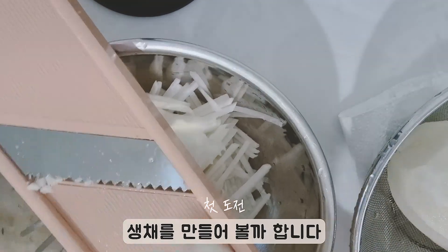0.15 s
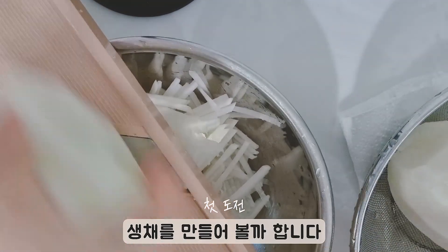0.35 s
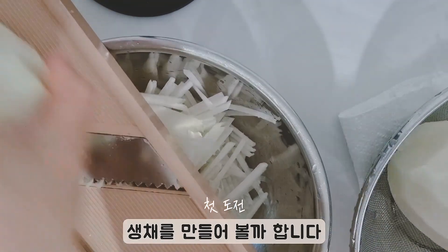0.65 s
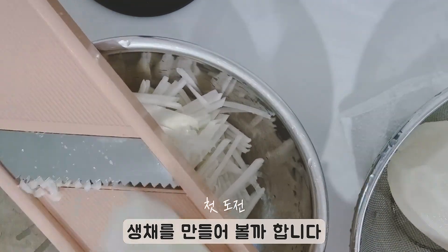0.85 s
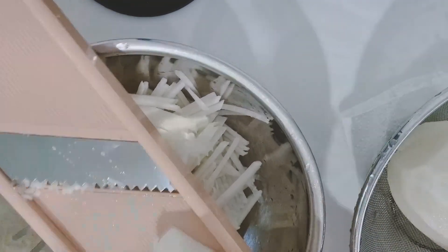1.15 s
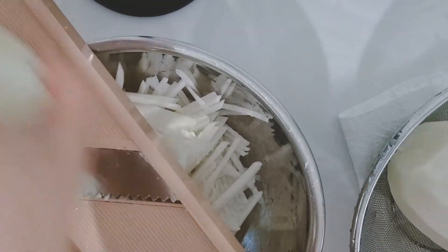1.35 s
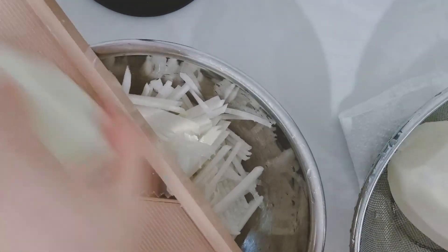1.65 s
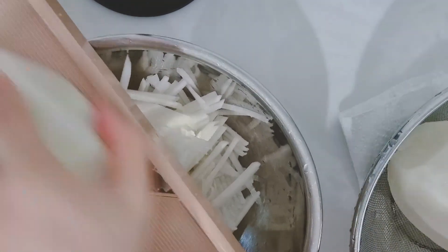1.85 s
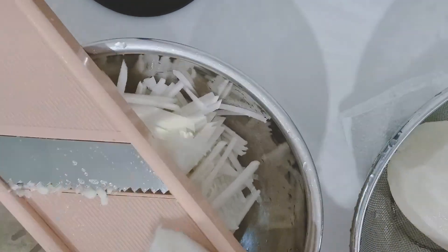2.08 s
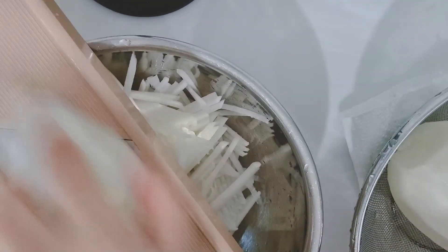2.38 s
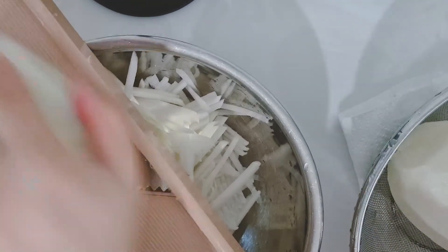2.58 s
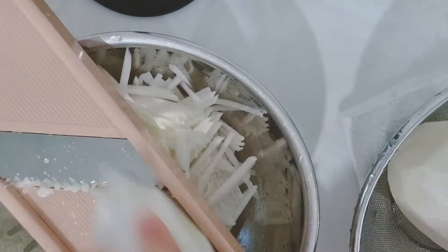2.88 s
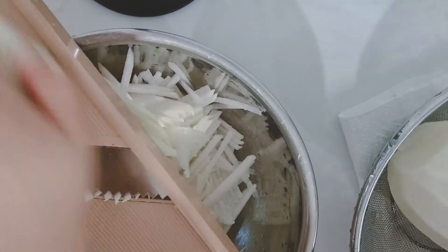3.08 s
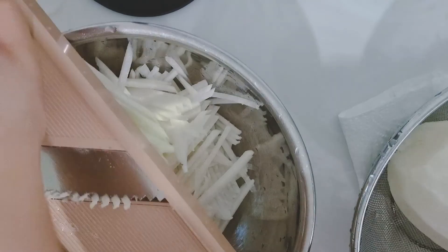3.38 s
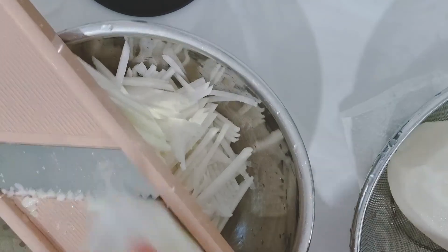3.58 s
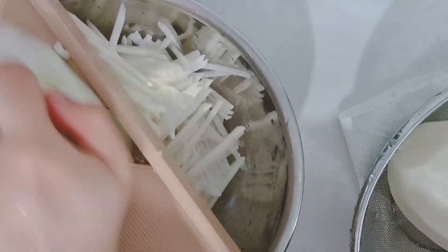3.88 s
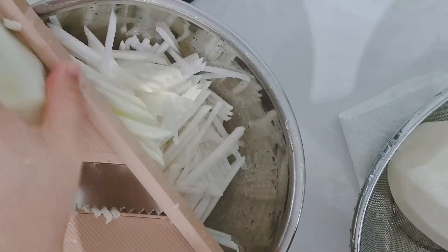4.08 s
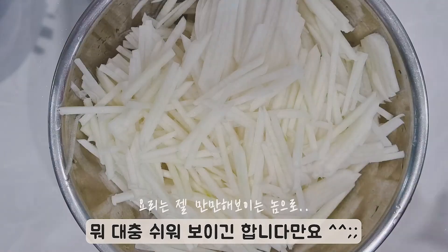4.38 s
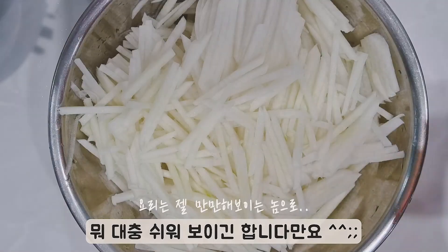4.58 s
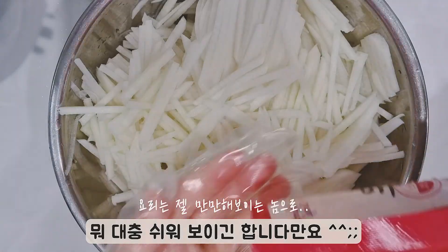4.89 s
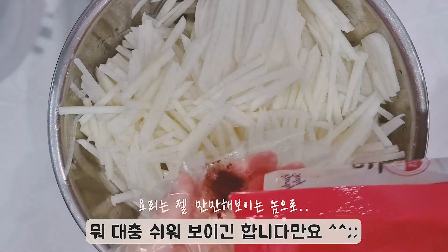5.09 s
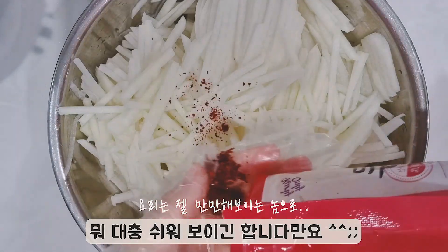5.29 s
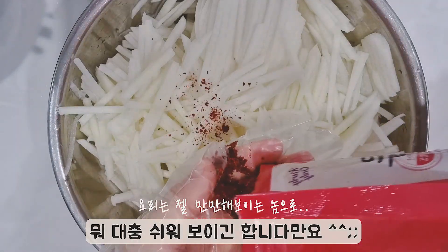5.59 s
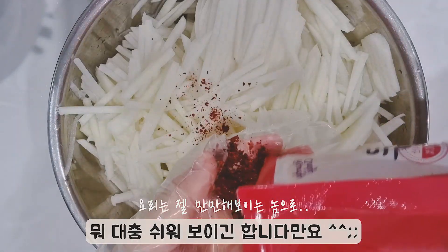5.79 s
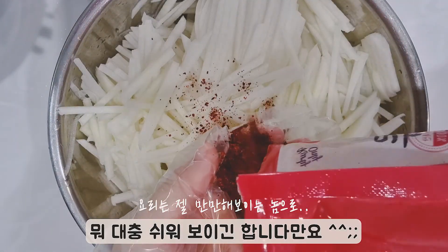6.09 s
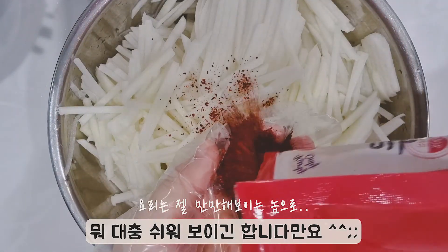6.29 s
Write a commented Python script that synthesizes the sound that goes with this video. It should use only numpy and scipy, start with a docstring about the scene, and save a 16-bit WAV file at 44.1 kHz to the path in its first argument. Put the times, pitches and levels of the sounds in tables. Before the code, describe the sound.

Brisk back-and-forth slicing, recorded close with little room echo: each juicy rasping cut is followed by a knock of the plastic board and a light brushing return, the bowl thumping faintly below. A tiny squeak comes early. Slicing stops with a hollow double tap, then much quieter plastic film rustles and crackles in irregular squeezes over soft room air, low rumble and a faint hum.

```python
"""Quiet room air and rumble throughout. A radish runs fast over a toothed board on a steel bowl: soft return
strokes (slip grains through a hiss and rings), knocks, mostly at the turn (noise bursts through resonances),
hissing cuts (tearing grains); early on, a squeak (falling sine). Two hollow toks (swelling sines) close it.
A second scene follows: an appliance hum (wavering sine) fades in and a plastic bag crinkles (snap grains,
ringing pings, dull taps). Drifting phases blur hits and part left from right."""
import sys
import numpy as np
from scipy import signal
from scipy.fft import rfft, irfft, next_fast_len
from scipy.io import wavfile
from scipy.ndimage import uniform_filter1d

SR = 44100
rng = np.random.default_rng(int(sys.argv[2]) if len(sys.argv) > 2 else 0)


def transcribe(u):
    """Save the signal u as a 16-bit wav file named by the first command-line argument.

    u: samples, shape (n,) or (channels, n), limited to [-1, 1]; the rate is SR.
    q: integer samples, one column per channel.
    """
    v = np.clip(np.atleast_2d(u).T, -1, 1)
    q = np.round(v * 32767).astype(np.int16)
    wavfile.write(sys.argv[1], SR, q)


def gain_from_db(level_db):
    """Turn a decibel level (scalar or array-like) into a linear amplitude factor."""
    decades = np.asarray(level_db, float) / 20
    return 10 ** decades


N = 284445
T = np.arange(N) / SR

# room air spectrum: f/Hz, density/dB
ROOM_SPECTRUM = [(32, -24.5), (55, 0.5), (100, -6), (150, -7.5), (215, -7.5), (444, -19), (634, -12.5),
                 (905, -23), (1290, -17), (1890, -23.5), (6650, -28), (9950, -33.5), (16000, -35)]
# level of air and rumble over time: t/s, level/dB
ROOM_LEVEL = [(0, 3), (4.18, 5), (4.21, -1), (4.34, -1), (4.42, 0.7), (6.45, 3)]
# left-right likeness of the air: f/Hz, correlation/1
ROOM_LIKENESS = [(60, 0.11), (240, 0.17), (950, 0.024), (3770, 0.072), (15000, 0.002)]
# building rumble, one mode: f/Hz, width/Hz, level/dB (before ROOM_LEVEL)
RUMBLE = (26, 4.8, -67.5)
# appliance hum: f/Hz, level/dB (before a 3 dB lift)
HUM = (162, -67)
# return strokes over the ridges: t/s, length/s, hiss level/dB, change to the turn/dB, board re hiss/dB
RETURNS = [(-.02, 0.028, -38.5, -5, -2.5), (0.063, 0.042, -63, 9.5, 0.5), (0.11, 0.019, -40.5, 3, 2),
           (0.364, 0.069, -51, 6.5, -2.5), (0.756, 0.063, -49, 2.5, 1), (1.085, 0.049, -49.5, 10, -0.5),
           (1.408, 0.05, -42.5, 6.5, -2), (1.671, 0.03, -63, 7, 0), (1.709, 0.035, -41.5, 5, 3),
           (2.014, 0.069, -49.5, 12.5, -1), (2.396, 0.068, -49.5, 9.5, 3), (2.739, 0.063, -60, 20, 4),
           (3.137, 0.071, -48.5, 9, 0.5), (3.48, 0.042, -48, 7.5, 3.5), (3.818, 0.075, -54, -16, 6),
           (4.081, 0.11, -71.5, 8, 2)]
# hiss of flesh on the ridges: f/Hz, level/dB
RETURN_HISS = [(880, -48.5), (1500, -15.5), (1760, -3.5), (2640, -4), (3180, -2.5), (4290, -7.5),
               (7690, -13.5), (8490, -18.5), (11000, -29), (16000, -44)]
# board modes: f/Hz, pole width/Hz (widened in knocks), level/dB
BOARD_MODES = [(373.5, 166, -5.5), (541.6, 57, -4.5), (604, 40, -3.5), (695.6, 66.5, 1.5),
               (800.6, 26, -6.5), (999, 47, -8), (1092, 270, 0.5), (1300, 330, -5)]
# bowl rocking on the counter, modes: f/Hz, pole width/Hz (widened in knocks), level/dB
BOWL_MODES = [(50.3, 20, -29.5), (79.24, 5.5, 4), (152.2, 59, -4.5), (202, 21.8, -7), (229.2, 54.5, -5)]
# juice and finest fibres: f/Hz, level/dB
RASP_SPECTRUM = [(1500, -21), (3000, -5.5), (6000, 3.5), (10000, -4.5), (12500, 0), (15500, 3),
                 (16000, -32.5)]
# knocks of the board, mostly at the turn, some at or within other strokes:
# t/s, board level/dB, thump re board/dB, crack re board/dB, strongest ring f/Hz
KNOCKS = [(0.106, -29.5, -15, -9.5, 630), (0.122, -28.5, 5.5, -6.5, 656), (0.295, -57, 15, -2, 600),
          (0.325, -44, -28, -15, 700), (0.362, -42, -12, -11, 800), (0.423, -34.5, 5.5, -17, 643),
          (0.807, -27.5, -4.5, -14, 757), (1.143, -22.5, 2.5, -7, 477), (1.316, -29.5, -15, -11, 744),
          (1.441, -17, -7, -9.5, 532), (1.705, -29.5, -8, -5.5, 660), (1.733, -27, 3, -27.5, 973),
          (2.062, -22, 1, 1, 516), (2.449, -26, 0, -8, 540), (2.787, -36, -9.5, -6.5, 684),
          (2.83, -30.5, -4.5, -25, 495), (3.034, -33.5, -6.5, -6, 820), (3.14, -37.5, -10.5, -3, 650),
          (3.191, -28, -6.5, -1.5, 720), (3.537, -22.5, -8.5, -2.5, 680), (3.619, -34, -17.5, -23, 685)]
# crack of a knock: f/Hz, level/dB
CRACK_SPECTRUM = [(880, -63.5), (1500, 5), (2770, 5), (3520, 7), (4460, -0.5), (4870, 3), (6060, 0.5),
                  (14300, -30.5), (16000, -28)]
# cutting strokes: t/s, length/s, hiss level/dB, change to the exit/dB, board re hiss/dB
CUTS = [(0.187, 0.08, -39.5, 6.5, 3.5), (0.551, 0.096, -35.5, -3, 1.5), (0.889, 0.1, -36, 0.5, 0),
        (1.224, 0.073, -34, -2.5, 0.5), (1.522, 0.081, -34.5, -1, 0), (1.812, 0.11, -31.5, -9, 1),
        (2.149, 0.13, -34.5, -2.5, -2.5), (2.529, 0.096, -34.5, 0, 0), (2.901, 0.12, -35, 0, -1),
        (3.251, 0.11, -34.5, -1.5, 1), (3.616, 0.1, -35.5, -1.5, -2), (3.912, 0.036, -35, -3.5, 3)]
# hiss of tearing fibres: f/Hz, level/dB
CUT_HISS = [(880, -57), (1500, -3.5), (2220, -5), (2440, 0.5), (2740, -8.5), (2960, 0), (4530, -2.5),
            (5160, 0), (5890, -8), (7590, -9.5), (9500, -19.5), (12400, -55.5), (20900, -120)]
# low bowl rocks, mostly during cuts: t/s, length/s, level/dB
ROCKS = [(0.561, 0.013, -42.5), (0.609, 0.043, -41), (0.956, 0.05, -43), (1.89, 0.033, -46),
         (2.148, 0.022, -40.5), (2.259, .02, -45.5), (2.54, 0.015, -53), (2.846, 0.052, -40),
         (3.362, .015, -44.5), (3.498, 0.018, -52.5), (3.61, 0.022, -42.5), (3.904, 0.06, -57)]
# lifted board taps the rim: t/s, peak level/dB, f/Hz, time to peak/s
TOKS = [(4.127, -31.5, 710, 0.0052), (4.136, -30.5, 770, 0.0048)]
# bag squeezes: t/s, length/s, crinkle level/dB, change to the end/dB, duller flexing re crinkle/dB
SQUEEZES = [(4.298, 0.0061, -64.5, -12, -20), (4.362, 0.0089, -68, 6.5, -17),
            (4.443, 0.056, -64.5, -4, -12), (4.533, 0.042, -60, -4, -9), (4.63, .04, -48, -24, -1.5),
            (4.68, 0.027, -39, -6, -3.5), (4.732, 0.11, -62, 4.5, -6.5), (4.899, 0.058, -58, 3.5, -5.5),
            (4.999, 0.054, -51, 1.5, -4.5), (5.099, 0.065, -47.5, -6, -14.5), (5.267, 0.021, -56.5, 3, -6),
            (5.334, .006, -47, -16, -13), (5.365, 0.083, -64, 6, -3.5), (5.473, .17, -51.5, -8.5, -13),
            (5.69, .006, -61.5, -1.5, -20.5), (5.727, 0.22, -63.5, 2.5, -11.5),
            (6.01, 0.0053, -57, -3.5, -5), (6.05, .17, -62, -3, -14), (6.253, 0.022, -51.5, 3, -15),
            (6.333, 0.017, -54.5, -4, -22), (6.372, .1, -66, -6, -23)]
# crinkle of film: f/Hz, level/dB
CRINKLE_SPECTRUM = [(1290, -30.5), (2200, -5), (2410, -8), (2710, -0.5), (4610, 1.5), (7090, 3.5),
                    (10800, -8), (12600, -5), (15100, -3), (16000, -35)]
# flexing of film: f/Hz, level/dB
FLEX_SPECTRUM = [(290, -16), (500, -10.5), (767, -3), (1080, -8.5), (1310, 0), (1830, -8), (2200, -9),
                 (2860, -15.5), (4840, -120)]
# single creases that ping: t/s, level/dB (before an 11 dB cut), f/Hz
PINGS = [(4.3024, -47, 4830), (4.358, -50, 2810), (4.9266, -34.5, 3560), (5.288, -35.5, 4300),
         (5.323, -36.5, 5900), (5.5494, -48, 5850), (5.6023, -40.5, 6760), (5.6805, -38, 6860),
         (5.899, -44.5, 2790), (6.067, -44.5, 6670), (6.1097, -46, 5680), (6.3288, -42.5, 6190),
         (6.4307, -45, 6880)]
# dull taps of the bag: t/s, level/dB (before a 7 dB cut), f/Hz
TAPS = [(4.586, -36.5, 850), (4.628, -42, 1260), (4.717, -44, 1340), (5.031, -44.5, 1490),
        (5.274, -48.5, 1300), (6.006, -36, 1760)]
# body of a tap: f/Hz, level/dB
TAP_SPECTRUM = [(150, -18), (250, -2.5), (450, -1), (742, 0), (1000, 1.5), (1690, 4.5), (1860, 3),
                (2400, -31), (3120, -57), (5280, -120)]
# stereo tilt of the action: f/Hz, left minus right/dB
SIDES = [(60, 3.5), (240, -0.5), (950, 0.5), (3770, 2), (15000, 2)]
# short diffuse tail: f/Hz, level/dB
ECHO_SPECTRUM = [(100, 8.5), (500, 1.5), (2000, -2), (6000, -10.5), (16000, 2)]
# balance of the action over time: t/s, left minus right/dB
PAN = [(0, -2), (4.18, -2), (4.45, 0), (6.45, 0)]

ROOM_DB = -66
START_DB_PER_S, STOP_DB_PER_S, SLIDE_THUMP_DB = 1303, 898, -7.5
NEARING_DB, NEARING_DB_PER_S = -12, 254.5  # light brush before full contact
SLIDE_RASP_DB, SLIDE_RASP_CLIMB = -11.5, .5  # rasp takes this share of the change in dB
KNOCK_PEAK_S, SHAKE_LENGTH_S = 0.011, 0.0055
SHAKE_DELAY_S, SHAKE_DB_PER_S = 0.0048, 1992  # rattle just after a knock
BOARD_SHAKE_DB, BOARD_CALM_DB_PER_S, BOWL_SHAKE_DB, BOWL_CALM_DB_PER_S = -5.5, 1198, -8.5, 478
BITE_DB_PER_S, EXIT_DB_PER_S, ARCH_DB = 1499, 754, 3  # teeth pull harder midway
TRAIL_DB, TRAIL_DB_PER_S = -30, 249.5  # last strips drop away
BOARD_ENDS_DB, CUT_THUMP_DB = 3, -13.5  # board spared the arch; bowl shakes under the push
BOARD_BITE_DB, BOARD_BITE_SHARE = 2.5, 0.099  # extra board ring as the teeth catch
RASP_DB, RASP_FADE_DB = -7.5, -3  # spray weakens against the hiss from the bite on
ROCK_DB_PER_S = 612
SQUEAK_S, SQUEAK_LENGTH_S, SQUEAK_DB = .475, .05, -60
SQUEAK_FIRST_HZ, SQUEAK_LAST_HZ = 1900, 1670
SQUEEZE_DB_PER_S, RELAX_DB_PER_S = 598, 437
ECHO_DB, ECHO_T60_S = -25.5, 0.24


def evened(x):
    """Scales to rms 1."""
    return x / np.sqrt(np.mean(x ** 2) + 1e-20)


def read(points, hz):
    """Reads a spectrum on a log-frequency axis."""
    f, value = np.transpose(points)
    return np.interp(np.log(hz + 1), np.log(f + 1), value)


def coloured(x, points):
    """Filters x by a spectrum, to rms 1."""
    size = next_fast_len(len(x))
    gain = gain_from_db(read(points, np.fft.rfftfreq(size, 1 / SR)))
    return evened(irfft(rfft(x, size) * gain, size)[:len(x)])


def ring(x, modes):
    """Passes x through parallel double-pole resonances (dark valleys between), to rms 1."""
    out = np.zeros(len(x))
    for hz, width_hz, db in modes:
        pole = np.exp((2j * np.pi * hz - np.pi * width_hz) / SR)
        mode = signal.lfilter([1], np.poly([pole, pole]), x).real
        out += gain_from_db(db) * width_hz ** 1.5 * mode
    return evened(out)


def held(x, window_s):
    """Evens out the slow chance swells of a narrow ring."""
    return x / np.sqrt(uniform_filter1d(x ** 2, round(window_s * SR)) + 0.042)


def grains(per_s, spread_db):
    """Tiny slips or snaps at random moments, of random sign, a few large."""
    size = gain_from_db(spread_db * np.minimum(rng.exponential(1, N), 5)) * rng.choice([-1., 1.], N)
    return size * (rng.random(N) < per_s / SR)


def clumped(x):
    """Slips come in bunches: slow random swells of level."""
    return x * gain_from_db(1.7 * evened(uniform_filter1d(rng.standard_normal(N), size=250)))


def chirps(per_s, low_hz, high_hz, size):
    """Grains that each ring briefly, at one of 16 pitches; size in samples."""
    t = np.arange(size) / SR
    out = np.zeros(N)
    for hz in np.geomspace(low_hz, high_hz, 16):
        ping = np.sin(2 * np.pi * hz * t) * signal.windows.hann(size)
        out += signal.oaconvolve(grains(per_s, 0.4), ping)[:N]
    return evened(out)


def burst(start_s, peak_s):
    """Sample range and sin-squared envelope: peaks at peak_s after the start, ends at twice that."""
    t = np.arange(4000) / SR
    shape = np.sin(np.pi * np.minimum(t / (2 * peak_s), 1)) ** 2
    at = round(start_s * SR)
    return slice(at, at + 4000), shape


def gesture(start_s, length_s, rise_db_per_s, fall_db_per_s):
    """Progress 0-1 through a movement, and its dB outline: rise before the start, fall after the end."""
    rise = rise_db_per_s * (T - start_s)
    fall = fall_db_per_s * (start_s + length_s - T)
    outline_db = np.minimum(0, np.minimum(rise, fall))
    return np.clip((T - start_s) / length_s, 0, 1), np.maximum(outline_db, -150)


def kitchen():
    """Air: shaped noise, sides mostly unlike; rumble: shaped noise, same on both; hum: wavering sine."""
    hz = np.fft.rfftfreq(N, 1 / SR)
    left, other = rfft(rng.standard_normal((2, N)))
    same = np.clip(read(ROOM_LIKENESS, hz), -1, 1)
    right = same * left + np.sqrt(1 - same ** 2) * other
    air = evened(irfft(np.array([left, right]) * gain_from_db(read(ROOM_SPECTRUM, hz)), N))
    rumble_hz, width_hz, rumble_db = RUMBLE
    rumble = held(ring(rng.standard_normal(N), [(rumble_hz, width_hz, 0)]), 0.11) * gain_from_db(rumble_db)
    room = gain_from_db(np.interp(T, *np.transpose(ROOM_LEVEL))) * (gain_from_db(ROOM_DB) * air + rumble)
    waver = np.array([ring(n, [(0, 2.8, 0)]) for n in rng.standard_normal((2, N))])
    hum_hz, hum_db = HUM
    hum = gain_from_db(hum_db + 3) * np.sin(2 * np.pi * hum_hz * T + 0.46 * waver)
    return room + hum * np.clip((T - 4.2) / 0.13, 0, 1)


def return_gains():
    """Gains of hiss, board, bowl and rasp through return strokes and the rattle after each knock."""
    out = np.zeros((4, N))
    for start_s, length_s, db, change_db, board_db in RETURNS:
        u, outline_db = gesture(start_s, length_s, START_DB_PER_S, STOP_DB_PER_S)
        nearing_db = gesture(start_s, 0.005, NEARING_DB_PER_S, STOP_DB_PER_S)[1] + NEARING_DB
        climb_db = np.outer([1, 1, 1, SLIDE_RASP_CLIMB], change_db * u)
        layer_db = np.array([[0], [board_db], [SLIDE_THUMP_DB], [SLIDE_RASP_DB]])
        out += gain_from_db(db + climb_db + layer_db) * (gain_from_db(outline_db) + gain_from_db(nearing_db))
    for s, db, thump_db, *_ in KNOCKS:
        at = s + SHAKE_DELAY_S, SHAKE_LENGTH_S, SHAKE_DB_PER_S
        out[1] += gain_from_db(db + BOARD_SHAKE_DB + gesture(*at, BOARD_CALM_DB_PER_S)[1])
        out[2] += gain_from_db(db + thump_db + BOWL_SHAKE_DB + gesture(*at, BOWL_CALM_DB_PER_S)[1])
    return out


def return_strokes():
    """Flesh slides on the ridges; the slips hiss and shake board and bowl."""
    slide = clumped(grains(5000, 3.43))
    hiss, board, thump, _ = return_gains()
    out = hiss * coloured(slide, RETURN_HISS)
    out += board * held(ring(slide, BOARD_MODES), 0.019)
    return out + thump * held(ring(slide, BOWL_MODES), 0.013)


def rasp():
    """Finest spray of both strokes: dense grains, independent on each side."""
    spray = np.array([coloured(grains(15000, 0.93), RASP_SPECTRUM) for side in range(2)])
    return (cut_gains()[3] + return_gains()[3]) * spray


def knocks():
    """Short noise blows drive board ring, bowl thump and crack, damped at once by the hand."""
    out, t = np.zeros(N + 4000), np.arange(4000) / SR
    for s, db, thump_db, crack_db, hz in KNOCKS:
        at, shape = burst(s - .005, KNOCK_PEAK_S)
        blow = shape * rng.standard_normal(4000)
        focus_db = 12 - 2.1 * crack_db  # per octave: a soft blow wakes only the modes near its spot
        struck = [(f, 2.14 * width, d - focus_db * abs(np.log2(f / hz))) for f, width, d in BOARD_MODES]
        pressed = [(f, 2.24 * width, d + 3 * np.log2(f / 100)) for f, width, d in BOWL_MODES]
        ringing = ring(blow, struck)
        thumping = ring(blow, pressed) * gain_from_db(-350 * t)
        cracking = coloured(np.roll(blow, 150), CRACK_SPECTRUM)  # 150 samples late
        parts = ringing, thumping, cracking
        # to a short-time rms peak of 1
        board, thump, crack = (p / np.sqrt(uniform_filter1d(p ** 2, 400).max()) for p in parts)
        hit = board + gain_from_db(thump_db) * thump + gain_from_db(crack_db) * crack
        out[at] += gain_from_db(db) * hit * signal.windows.tukey(4000, .05)
    return out[:N]


def cut_gains():
    """Gains of hiss, board, bowl and rasp through cutting strokes; low rocks add to the bowl."""
    out = np.zeros((4, N))
    for start_s, length_s, db, change_db, board_db in CUTS:
        u, outline_db = gesture(start_s, length_s, BITE_DB_PER_S, EXIT_DB_PER_S)
        trail_db = gesture(start_s, length_s, BITE_DB_PER_S, TRAIL_DB_PER_S)[1] + TRAIL_DB
        arch = 4 * u * (1 - u)
        push = gain_from_db(db + change_db * u + ARCH_DB * arch) * (gain_from_db(outline_db) + gain_from_db(trail_db))
        catch_db = BOARD_BITE_DB * np.exp(-u / BOARD_BITE_SHARE)
        out[0] += push
        out[1] += push * gain_from_db(board_db - BOARD_ENDS_DB * arch + catch_db)
        out[2] += push * gain_from_db(CUT_THUMP_DB)
        out[3] += push * gain_from_db(RASP_DB + RASP_FADE_DB * u)
    for start_s, length_s, db in ROCKS:
        out[2] += gain_from_db(db + gesture(start_s, length_s, ROCK_DB_PER_S, ROCK_DB_PER_S)[1])
    return out


def cut_strokes():
    """Fibres tear on the teeth, with added chirps; the slips hiss and shake board and bowl."""
    tear = clumped(grains(3500, 2.2))
    crunch = coloured(tear, CUT_HISS) + 0.5 * chirps(60, 1805, 7866, size=300)
    hiss, board, thump, _ = cut_gains()
    out = hiss * crunch + board * held(ring(tear, BOARD_MODES), 0.024)
    return out + thump * held(ring(tear, BOWL_MODES), 0.022)


def squeak():
    """Wet flesh squeaks on the blade: a short falling sine that flutters."""
    u, outline_db = gesture(SQUEAK_S, SQUEAK_LENGTH_S, 1000, 1200)
    flutter = 1 + .5 * evened(uniform_filter1d(rng.standard_normal(N), size=300))
    hz = SQUEAK_FIRST_HZ + (SQUEAK_LAST_HZ - SQUEAK_FIRST_HZ) * u
    return gain_from_db(SQUEAK_DB + outline_db) * flutter * np.sin(2 * np.pi * np.cumsum(hz) / SR)


def toks():
    """One air-filled mode that swells in a few ms and dies."""
    out = np.zeros(N)
    for s, db, hz, peak_s in TOKS:
        age = np.maximum(T - s, 0) / peak_s
        out += gain_from_db(db) * age * np.exp(1 - age) * np.sin(2 * np.pi * hz * T)
    return out


def squeezes():
    """Gains of crinkle and flexing as the bag is handled."""
    out = np.zeros((2, N))
    for start_s, length_s, db, change_db, flex_db in SQUEEZES:
        u, outline_db = gesture(start_s, length_s, SQUEEZE_DB_PER_S, RELAX_DB_PER_S)
        out += gain_from_db(db + change_db * u + outline_db + np.array([[0], [flex_db]]))
    return out


def bag():
    """Creases in thin film snap densely; some ring for a few cycles at their own pitch."""
    squeeze, flex = squeezes()
    snaps = grains(2500, 1.06)
    crinkle = coloured(snaps, CRINKLE_SPECTRUM) + .5 * chirps(13, 2960, 7920, size=350)
    out = np.r_[squeeze * crinkle + flex * coloured(snaps, FLEX_SPECTRUM), np.zeros(4000)]
    for s, db, hz in PINGS:
        at, shape = burst(s - .002, .009)
        out[at] += gain_from_db(db - 11) * shape * ring(rng.standard_normal(4000), [(hz, 900, 0)])
    for s, db, hz in TAPS:
        at, shape = burst(s - .003, 0.011)
        noise = rng.standard_normal(4000)
        body = coloured(noise, TAP_SPECTRUM) + 0.6 * ring(noise, [(hz, 450, 0)])
        out[at] += gain_from_db(db - 7) * shape * body
    return out[:N]


def phase_drifted(x, drift_rad=0.45):
    """Lets phases drift by band and side, as speeding up does; short-time spectra stay, hits blur."""
    hz, _, z = signal.stft(x, SR, nperseg=2048, noverlap=1536)
    drift = rng.standard_normal((2, z.shape[1], z.shape[0]))  # side, frame, band
    drift = uniform_filter1d(drift, size=12, axis=1)
    for _ in range(2):
        drift = uniform_filter1d(drift, size=14, axis=2)
    drift = evened(drift).transpose(0, 2, 1) * drift_rad
    side = gain_from_db(np.outer([.5, -.5], read(SIDES, hz)))[:, :, None]
    turned = z * side * np.exp(2j * np.pi * drift)
    return signal.istft(turned, nperseg=2048, noverlap=1536)[1][:, :N]


def echoed(x):
    """Kitchen answers briefly: adds a decaying noise tail, different on each side."""
    t = np.arange(SR // 2) / SR
    out = []
    for side, noise in zip(x, rng.standard_normal((2, len(t)))):
        tail = coloured(noise, ECHO_SPECTRUM) * gain_from_db(-60 * t / ECHO_T60_S) * (t > .004)
        out.append(side + gain_from_db(ECHO_DB) * signal.oaconvolve(side, tail / np.linalg.norm(tail))[:N])
    return np.array(out)


def scene():
    """Board, then bag, with echo and balance, over the kitchen."""
    strokes = return_strokes() + cut_strokes() + squeak()
    action = phase_drifted(strokes + knocks() + toks() + bag()) * gain_from_db(0.5) + rasp() * gain_from_db(1.5)
    balance = gain_from_db(np.outer([.5, -.5], np.interp(T, *np.transpose(PAN))))
    return echoed(action) * balance + kitchen()


def top_cut(x):
    """Nothing passes above the cut-off."""
    return signal.sosfilt(signal.butter(12, 16910, fs=SR, output="sos"), x)


def record(dry):
    """Delivers the finished mix."""
    return top_cut(dry)


dry = scene()
out = record(dry)
transcribe(out)
```